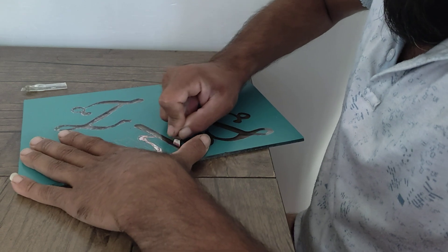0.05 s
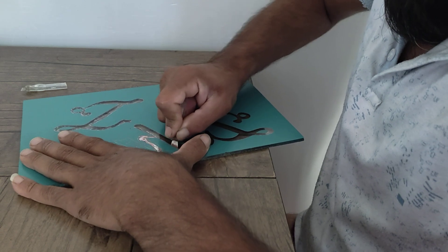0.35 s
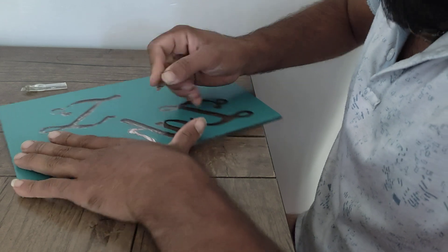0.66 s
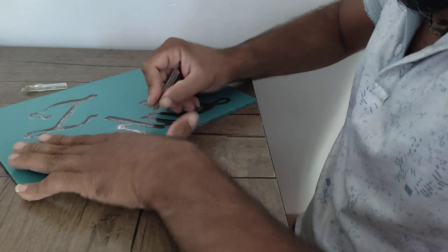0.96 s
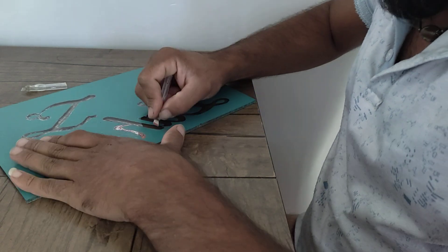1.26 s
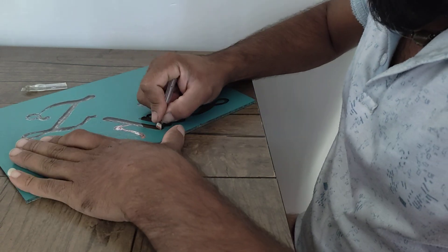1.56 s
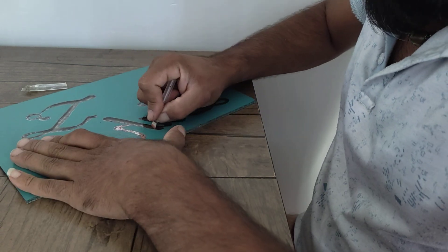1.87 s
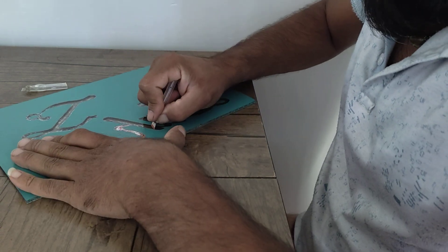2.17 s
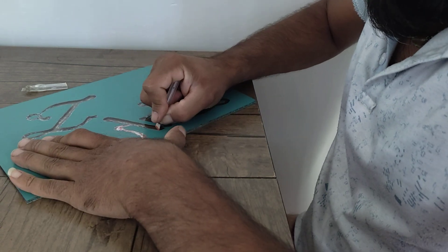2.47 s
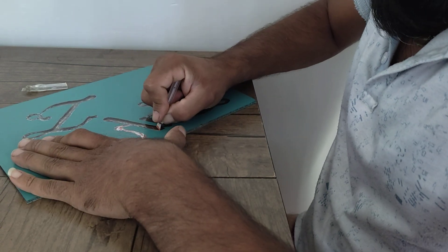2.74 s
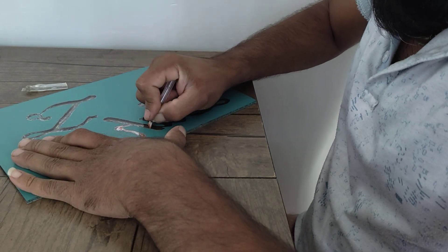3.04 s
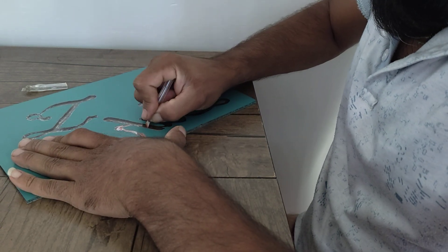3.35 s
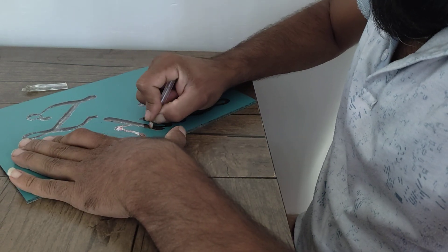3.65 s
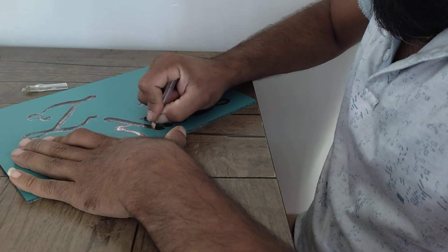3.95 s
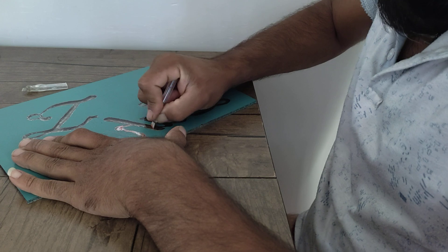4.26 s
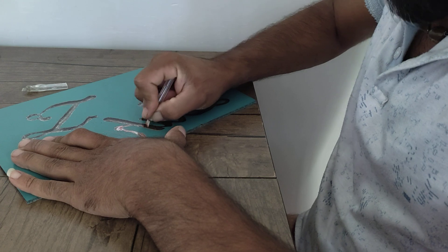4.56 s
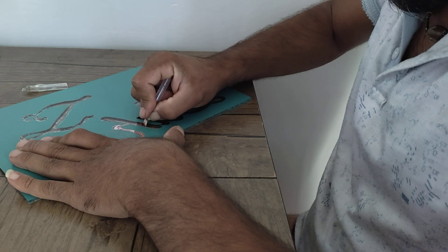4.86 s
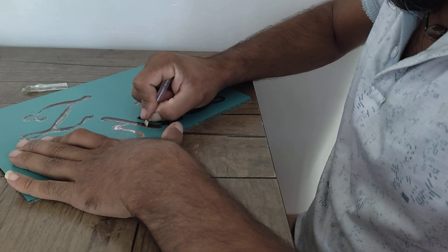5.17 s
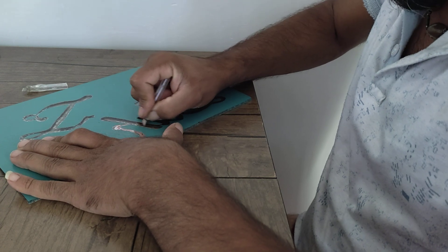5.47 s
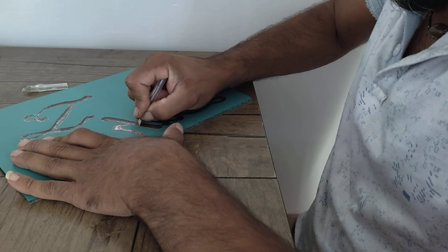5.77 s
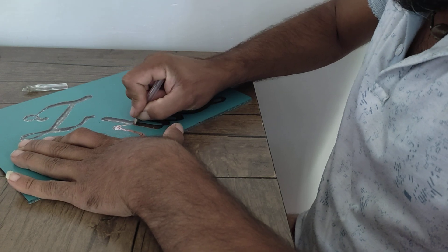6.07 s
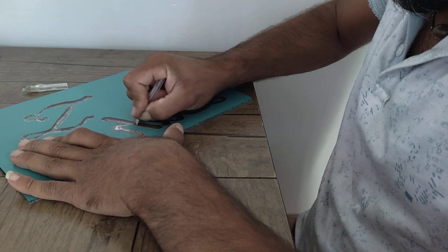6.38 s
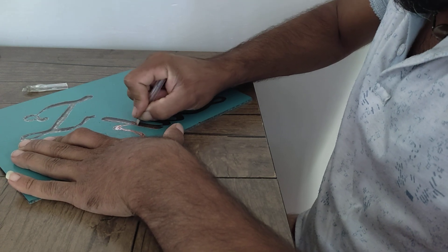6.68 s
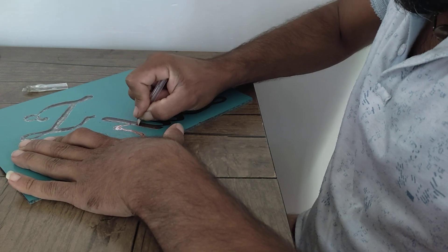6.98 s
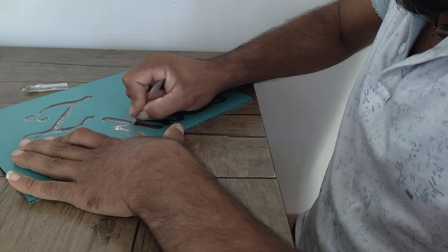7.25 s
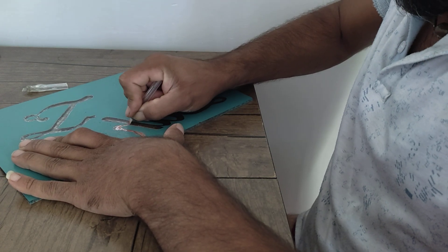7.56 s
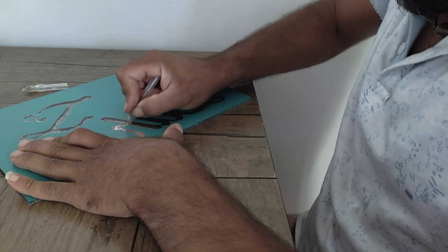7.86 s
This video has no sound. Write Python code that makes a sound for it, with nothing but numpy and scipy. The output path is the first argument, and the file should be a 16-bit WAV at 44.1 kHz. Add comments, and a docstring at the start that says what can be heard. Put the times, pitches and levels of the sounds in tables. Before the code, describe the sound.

Close by in a quiet room, a small pointed tool digs a groove in a thin board. First the board is shifted, rubbing and bumping lightly on the wooden table. Then come gritty scrapes, two or three a second, full of crisp snapping chips and growing stronger in the second half. The board rings briefly and the table resonates low, over a light echo and faint hum.

```python
"""A small pointed tool carves a groove in a thin board on a wooden table in a quiet room.
In the first second the board is shifted: it rubs and judders over the table. From 1.7 s on come short
strokes in which the point digs in, sticks, slips, breaks off chips and eases out; once it squeaks.
Slips and chips make the board ring, and heavy pushes leave the table swinging with a low tone.
All along the room echoes, and soft air noise and mains hum lie underneath."""
import sys
import numpy as np
from scipy import signal
from scipy.io import wavfile

SR = 44100
rng = np.random.default_rng(int(sys.argv[2]) if len(sys.argv) > 2 else 0)


def log_audio(samples):
    """Write samples as a 16-bit WAV file to the path given in sys.argv[1]."""
    # one column per channel
    frames = np.atleast_2d(samples).T
    # limit to full scale, then quantise
    limited = np.clip(frames, -1, 1)
    pcm = np.round(limited * 32767).astype(np.int16)
    wavfile.write(sys.argv[1], SR, pcm)


N = 358091
TIME = np.arange(N) / SR

# strokes and light touches of the tool: start_s, dig_in_s, ease_out_s, scrape_db, small_chip_db,
# depth_db (weight of the lower tones), push_db
STROKES = [ (1.729, 0.052, 0.068, -47, -34, 0.5, -37), (2.215, 0.033, 0.07, -31.5, -24.5, -2.5, -42.5),
           (2.561, .06, .11, -44, -21, 1, -39), (2.933, 0.012, 0.018, -32, -47, 0, -49),
           (3.034, 0.013, 0.06, -39.5, -39, 1.5, -41.5), (3.336, 0.077, 0.057, -32, -21.5, -3.5, -44.5),
           (3.694, 0.096, 0.051, -26.5, -22.5, -6, -39.5), (4.042, 0.043, 0.09, -20, -10.5, -6.5, -36),
           (4.385, 0.11, 0.1, -31.5, -21, -5, -40.5), (5.25, 0.0053, 0.0081, -57, -52, 9, -60),
           (5.331, 0.13, 0.03, -24.5, -10, -5, -35.5), (5.665, 0.031, 0.025, -43, -52, 0, -58),
           (5.703, 0.047, .137, -22, -14, -7, -39), (6.066, 0.092, 0.064, -24.5, -16, -1, -33.5),
           (6.407, .13, .093, -29, -15.5, -2.5, -37), (6.762, 0.099, 0.067, -21, -9, -1.5, -34),
           (7.151, 0.048, 0.023, -27, -18, -4.5, -40.5), (7.221, 0.031, 0.028, -21.5, -11, -7, -49),
           (7.445, 0.014, 0.032, -46, -36, 5, -46), (7.492, 0.038, 0.1, -21, -11, -1, -34.5),
           (7.799, 0.017, 0.068, -22, -14, -0.5, -34.5)]
# big chips that snap out above the rasp: start_s, level_db, length_ms
BIG_CHIPS = [(1.711, -34.5, 4.6), (1.7312, -29, 2.3), (1.761, -17, 4), (1.7856, -16.5, 1),
             (1.8152, -13, 2.1), (1.8313, -16.5, 4.4), (2.2227, -17, 1.8), (2.2524, -16, 5.4),
             (2.5616, -13, 2.1), (2.5823, -9, 3.4), (2.5968, -9, 2.1), (2.6037, -10, 3.2),
             (2.6182, -10, 9.7), (2.6354, -16.5, 8.6), (2.6802, -17.5, 1.6), (2.707, -17.5, 4.3),
             (2.9352, -18.5, 3.6), (2.9481, -18.5, 2.7), (3.0426, -24, 6.6), (3.0529, -26, 1.5),
             (3.0815, -25.5, 2.6), (3.378, -20.5, 4.8), (3.3959, -16.5, 11), (3.4071, -16, 5.6),
             (3.694, -21, 2.5), (3.758, -34, 3.2), (3.7719, -19, 8.3), (4.0518, -14, 1.1),
             (4.0604, -18, 1.9), (4.0803, -9, 2), (4.0888, -8, 2.7), (4.0974, -8.5, 3.1),
             (4.4534, -18, 2.5), (4.467, -13, 13), (4.4857, -9.5, 3.6), (4.509, -29, 2), (4.539, -8.5, 1.6),
             (4.5479, -10, 8.3), (4.571, -15.5, 1.9), (5.3605, -20, 3.9), (5.4145, -5.5, 1.1),
             (5.4232, -7.5, 2.9), (5.4453, -7.5, 3.2), (5.4763, -9.5, 2.4), (5.7125, -16, 1.4),
             (5.749, -15, 7.4), (5.7968, -5.5, 2.6), (5.816, -7.5, 3.6), (5.86, -6, 4.5),
             (5.8743, -3.5, 2.2), (5.8803, -7.5, 3.1), (6.0687, -23, 3.3), (6.0968, -14.5, 1.6),
             (6.1113, -9, 1.9), (6.117, -7, 3.5), (6.128, -6.5, 1.4), (6.1339, -5, 2.5),
             (6.1581, -8.5, 7.4), (6.2094, -21, 2.1), (6.4097, -25, 5.1), (6.4875, -12.5, 7.6),
             (6.524, -9, 1.2), (6.5398, -11.5, 8.6), (6.5676, -10.5, 4.9), (6.6177, -12.5, 5),
             (6.7765, -34, 2.3), (6.876, -10.5, 6.9), (7.1737, -11.5, 19), (7.2427, -10.5, 2.1),
             (7.4996, -13, 2.1), (7.507, -6, 0.97), (7.5171, -8.5, 2.9), (7.5382, -5.5, 4),
             (7.58, -7.5, 5.8), (7.5981, -6, 2.2), (7.6055, -7, 8.2), (7.626, -8.5, 6.6), (7.805, -15, 2.1),
             (7.818, -10.5, 2.7), (7.8306, -11, 4.2), (7.869, -10, 6.1), (7.892, -12, 3.5)]
# how long the board's dense vibration takes to fade by 60 dB: pitch_hz, ring_s
BOARD_RING = [(200,0.041),(2000,0.039),(5000,0.0021),(13000,0.023)]
# how alike left and right are, for close sound and for room sound: pitch_hz, likeness (-1 to 1)
CLOSE_LIKENESS = [(100,0.89),(400,1),(1200,-0.09),(2400,-0.034),(5000,-0.32),(9000,0.017),(14000,-0.97)]
ROOM_LIKENESS = [(40,0),(200,0.69),(400,0.57),(800,0.05),(1500,0.0067),(14000,0)]


def carving():
    """Slips and chips make the board ring; the push of the point shakes board and table together."""
    # tones of board and table moving together: pitch_hz, width_hz, level_db, left_over_right_db
    table_tones = [(81,6.8,0,4.5),(104.5,3.2,8,-2.5),(166.8,12.5,8,1),(230,25,3,0.5),(307.8,34.7,5.5,0),(425,24,-9.5,16.5)]
    contact, travel, scrape_db, depth_db, push_db = strokes()
    rasp = contact * from_db(-1) * rasping(scrape_db)
    crumbs = from_db(-8) * small_chips()
    force = (rasp + crumbs) * stuck_point() + from_db(-8) * big_chips()
    # a deeper bite gives more weight to the lower part of the sound
    lower, upper = split(force, split_hz=2850)
    force = upper + lower * from_db(1.5 + 0.81 * depth_db)
    tremor = stick_slip(per_s=100, uneven=0.6, spread=0.35, slip_s=0.0016, rub=0.4)
    shove = contact * from_db(13 + push_db) * tremor
    body = resonate(shove + from_db(-4) * force, table_tones)
    return ringing_board(force, travel) + body + from_db(-2) * room(body, delay_s=0.00656)


def strokes(deepen_db=0.5, light_push_db=-17, build_share=0.38):
    """The hand guides the point: contact and travel (0 to 1), then scrape, depth and push (dB)."""
    contact, travel, scrape, depth, push = np.zeros((5, N))
    for start_s, dig_in_s, ease_out_s, scrape_db, _, depth_db, push_db in STROKES:
        at = round(start_s * SR)
        age = TIME[:N - at]
        done = np.minimum(age / (dig_in_s + ease_out_s), 1)
        contact[at:] = touching(age, dig_in_s + ease_out_s, edge_s=0.00068)
        travel[at:] = done
        scrape[at:] = scrape_db + arch(age, dig_in_s, ease_out_s, first_db=-11.5, last_db=-11)
        depth[at:] = depth_db + deepen_db * (done - 0.5)
        # the push starts light and is full after build_share of the stroke
        push[at:] = push_db + light_push_db * np.maximum(1 - done / build_share, 0)
    return contact, travel, scrape, depth, push


def rasping(scrape_db):
    """A light touch only rubs dully; a harder one tears the surface and gains treble."""
    slips = stick_slip(per_s=220, uneven=0.5, spread=0.3, slip_s=0.0008, rub=0.5)
    rub, tear = split(slips, split_hz=4600)
    treble_db = np.minimum(2 + 0.25 * scrape_db, 0)
    return from_db(scrape_db) * (rub + tear * from_db(treble_db))


def stick_slip(per_s, uneven, spread, slip_s, rub):
    """Two surfaces catch and let go at uneven times; each slip is a short burst over steady rubbing."""
    draws = rng.uniform(-1, 1, (6000, 2))
    gaps_s = np.exp(uneven * draws[1:, 0]) / per_s
    starts = np.append(0, np.cumsum(gaps_s))
    latest = np.searchsorted(starts, TIME, "right") - 1
    bursts = np.exp(spread * draws[latest, 1] - (TIME - starts[latest]) / slip_s)
    return rms_one((rms_one(bursts) + rub) * rng.standard_normal(N))


def stuck_point(stick_s=0.0097, hush_db=-6.5):
    """Before a big chip gives way the point is stuck; this gain makes the rasp dip there."""
    gain = np.ones(N)
    time_left = TIME[SR // 25:0:-1]
    for start_s, _, _ in BIG_CHIPS:
        at = round(start_s * SR)
        gain[at - len(time_left):at] *= from_db(hush_db * np.exp(-(time_left / stick_s) ** 2))
    return gain


def big_chips(treble_hz=5360, treble_db=3, treble_length_share=0.71):
    """Big chips snap out; their treble is spent sooner than the rest of their sound."""
    dull, _ = split(breaking(BIG_CHIPS, crack=4.3, scatter=0.49), treble_hz)
    shorter = [(start_s, db + treble_db, ms * treble_length_share) for start_s, db, ms in BIG_CHIPS]
    _, sharp = split(breaking(shorter, crack=4.3, scatter=0.46), treble_hz)
    return dull + sharp


def small_chips(per_s=96, length_ms=2.3, uneven=0.3, spread_db=1):
    """All through a stroke the point breaks off small chips, the largest where it bites deepest."""
    chips = []
    for start_s, dig_in_s, ease_out_s, _, chip_db, _, _ in STROKES:
        gap_draws, level_draws = rng.uniform(-1, 1, (2, 40))
        ages = np.cumsum(np.exp(uneven * gap_draws) / per_s)
        bite_db = arch(ages, dig_in_s, ease_out_s, first_db=-14.5, last_db=-11.5)
        levels_db = chip_db + bite_db + spread_db * level_draws
        chips += [(start_s + age, db, length_ms)
                  for age, db in zip(ages, levels_db) if age < dig_in_s + ease_out_s]
    return breaking(chips, crack=2.2, scatter=0.89)


def breaking(chips, crack, scatter):
    """Each chip starts with a sharp crack and tears free over a few milliseconds."""
    force, size = np.zeros(N), SR // 50
    noise, strength = rng.standard_normal((2, N))
    tear = noise * np.exp(scatter * np.clip(strength, -2, 2))   # a few fibres snap harder than the rest
    for start_s, level_db, length_ms in chips:
        at = round(start_s * SR)
        fade = np.exp(-(TIME[:size] * 1000 / length_ms) ** 1.5)
        burst = rms_one(tear[at:at + size] * fade) * np.sqrt(np.mean(fade ** 2))
        burst[0] = crack
        force[at:at + size] += from_db(level_db) * burst
    return force


def ringing_board(force, travel, spots=7, detune=0.03):
    """As the point moves, each spot of the groove shakes the board and the room in its own way."""
    # tones of the bending board: pitch_hz, width_hz, level_db, left_over_right_db
    board_tones = [(655,28,-9.5,6),(1249,23.5,-7.5,3),(1802,48,-4,-17),(2860,78,4,9.5),(3196,350,4,-1.5),(3820,146,8.5,2),(4636,440,1.5,-4),(5660,91,-2,10.5),(6540,153,-2.5,-15.5),(9830,157,-14.5,23),(11870,480,-2.5,9)]
    # its dense, quickly dying vibration: pitch_hz, level_db
    board_colour = [(100,-29),(300,-5),(520,-18.5),(680,-8),(1000,-4.5),(1600,-4.5),(2400,2),(3500,4),(4800,4),(6300,2),(7800,-14.5),(10000,-11.5),(12500,7),(14500,-4.5)]
    # the side that vibration leans to: pitch_hz, left_over_right_db
    board_sides = [(300,-7.5),(1200,0),(4000,-6.5),(7000,7.5),(9000,-24),(11000,9.5),(14000,9)]
    # a tone that speaks more as the groove lengthens: pitch_hz, width_hz, level_db, left_over_right_db
    groove_tone = [(2170,160,7,2.5)]
    # the strength of that tone: time_s, level_db
    groove_strength = [(1.7,-6.5),(3.4,-1),(5.4,-3),(6.1,-0.5),(7.8,0.5)]
    groove_db = np.interp(TIME, *np.transpose(groove_strength))
    groove = resonate(force * from_db(groove_db), groove_tone)
    out, size = np.zeros((2, N)), SR // 8
    for spot in range(spots):
        share = np.sqrt(np.maximum(1 - np.abs(travel * (spots - 1) - spot), 0))
        tones = [(hz * (1 + detune * rng.uniform(-1, 1)), *rest) for hz, *rest in board_tones]
        dense = shaped_noise(size, board_colour, CLOSE_LIKENESS, BOARD_RING, board_sides)
        ring = from_db(1.5) * resonate(signal.unit_impulse(size), tones)
        board = through(force * share, dense + ring) + groove * share
        out += board + room(board, delay_s=0.007)
    return out


def table_swing(rise_s=0.054):
    """A low tone of the table top swells and rings on after each heavy push."""
    # swings under the leaning hand: start_s, level_db, pitch_hz, ring_s (time to fade by 60 dB)
    swings = [(.002,-23,83,0.15),(0.189,-37.5,100,0.7),(1.773,-35,170,0.71),(2.581,-22,168.4,0.19),(3.381,-25,169.6,0.3),(4.521,-40,101.8,0.68),(5.43,-31,102,0.84),(6.18,-46,103.8,0.95),(6.562,-37,103.3,1),(6.872,-38,103.3,0.97),(7.548,-30.5,101.3,0.75),(7.84,-38.5,102.8,0.97)]
    out = np.zeros(N)
    for start_s, level_db, pitch_hz, ring_s in swings:
        at = round(start_s * SR)
        age = TIME[:N - at]
        swell = 1 - np.exp(-age / rise_s)
        out[at:] += from_db(level_db - 60 * age / ring_s) * swell * np.sin(2 * np.pi * pitch_hz * age)
    return out


def sliding_board(gain_db=5.5):
    """The board rubs over the table under the hand, loudest where it moves fastest."""
    # the slides: start_s, speed_up_s, slow_down_s, level_db
    slides = [(0, 0.0017, 0.038, -44), (.113, 0.0074, 0.033, -51), (0.18, 0.034, 0.016, -45),
              (0.374, 0.0057, 0.0245, -45), (0.589, 0.038, 0.08, -54), (.72, 0.13, .25, -63)]
    # tone colour of the rubbing: pitch_hz, level_db
    rub_colour = [(60,-13),(150,9.5),(300,0.5),(450,-5),(700,-4.5),(1150,-9),(2100,-3.5),(4000,-10),(6000,-15),(8000,-23),(14000,-22)]
    grain = stick_slip(per_s=140, uneven=0.65, spread=0.83, slip_s=0.0025, rub=0.88)
    rub = rms_one(through(grain, shaped_noise(SR // 8, rub_colour, CLOSE_LIKENESS, BOARD_RING)))
    loudness = np.zeros(N)
    for start_s, speed_up_s, slow_down_s, level_db in slides:
        age = TIME - start_s
        contact = touching(age, speed_up_s + slow_down_s, edge_s=0.001)
        speed_db = arch(age, speed_up_s, slow_down_s, first_db=-8.5, last_db=-8.5)
        loudness += contact * from_db(gain_db + level_db + speed_db)
    return rub * loudness


def juddering_board(gain_db=36.5):
    """As the board is turned it jumps on in small dull knocks."""
    # the jumps: start_s, level_db
    jumps = [(0.379, -39.5), (0.76, -39.5), (0.803, -49), (0.822, -41.5), (0.865, -40.5), (0.896, -43),
             (0.934, -41.5), (0.956, -44), (0.968, -48)]
    # tone colour of a knock: pitch_hz, level_db
    knock_colour = [(100,-21),(250,-7),(450,4.5),(650,-17),(950,-4),(1400,-16),(3000,-14),(8000,-38)]
    # how long a knock takes to fade by 60 dB: pitch_hz, ring_s
    knock_ring = [(200,0.036),(600,0.0085),(3000,0.014)]
    knocks = np.zeros(N)
    for start_s, level_db in jumps:
        knocks[round(start_s * SR)] = from_db(level_db + gain_db)
    return through(knocks, shaped_noise(SR // 8, knock_colour, CLOSE_LIKENESS, knock_ring))


def squeak():
    """The slips of the point lock to one pitch for a few milliseconds."""
    # the point squeaks as it catches: start_s, level_db, pitch_hz, rise_s
    squeaks = [(3.689,-25,4920,0.0011)]
    out, age = np.zeros(N), TIME[:SR // 20]
    for start_s, level_db, pitch_hz, rise_s in squeaks:
        at = round(start_s * SR)
        swell = age / rise_s * np.exp(1 - age / rise_s)
        out[at:at + len(age)] += from_db(level_db) * swell * np.sin(2 * np.pi * pitch_hz * age)
    return out


def room(sound, delay_s):
    """The walls answer a little later, the bass lasting longest."""
    # tone colour of the echo: pitch_hz, level_db
    echo_colour = [(100,-3),(400,-0.5),(1500,-5.5),(2600,-2),(4500,-7.5),(7000,-7.5),(13000,-11.5)]
    # how long the echo takes to fade by 60 dB: pitch_hz, ring_s
    echo_ring = [(100,0.8),(260,0.45),(700,0.57),(1840,0.46),(4850,0.33),(12800,0.27)]
    tail = shaped_noise(SR * 3 // 4, echo_colour, ROOM_LIKENESS, echo_ring)
    return through(sound, np.pad(tail, ((0, 0), (round(delay_s * SR), 0))))


def background(air_db=-53.5):
    """Still room air with a steady mains hum."""
    # tone colour of the air: pitch_hz, level_db
    air_colour = [(25,-29),(60,-13),(100,-1),(140,-5),(205,-1),(260,-6),(350,-8),(520,-14.5),(900,-15),(1250,-19),(4700,-24.5),(6200,-27.5),(7500,-36.5),(14000,-31)]
    # hum and faint electrical whine: pitch_hz, level_db
    hum_tones = [(100,-75),(199.5,-63),(297,-65.5),(2498,-80.5),(4996,-79),(7547,-101),(9997,-90.5)]
    hum = sum(np.sqrt(2) * from_db(db) * np.sin(2 * np.pi * (hz * TIME + rng.random()))
              for hz, db in hum_tones)
    return from_db(air_db) * rms_one(shaped_noise(N, air_colour, ROOM_LIKENESS)) + hum


def arch(age, rise_s, fall_s, first_db, last_db):
    """Level in dB of a push of the hand: it rounds up to 0 dB and sinks again."""
    rising = np.clip(1 - age / rise_s, 0, 1)
    falling = np.clip((age - rise_s) / fall_s, 0, 1)
    return first_db * rising ** 2 + last_db * falling ** 2


def touching(age, length_s, edge_s):
    """Contact (0 to 1) that begins at age 0 and lasts for length_s."""
    return np.clip(np.minimum(age, length_s - age) / edge_s, 0, 1)


def resonate(force, tones):
    """A force sets tones ringing, every second one upside down, each leaning to its own side."""
    out = np.zeros((2, len(force)))
    for k, (pitch_hz, width_hz, level_db, lean_db) in enumerate(tones):
        decay = np.exp(-np.pi * width_hz / SR)
        feedback = [1, -2 * decay * np.cos(2 * np.pi * pitch_hz / SR), decay ** 2]
        ring = (1 - decay ** 2) / 2 * signal.lfilter([1, 0, -1], feedback, force + 1e-18)
        out += (-1) ** k * ring * from_db([[level_db + lean_db / 2], [level_db - lean_db / 2]])
    return out


def shaped_noise(size, colour, likeness, ring=None, sides=None):
    """Stereo noise built in third-octave bands; it dies away if ring times are given."""
    edges_hz = np.geomspace(22, 16000, 29)
    out, white = np.zeros((2, size)), rng.standard_normal((2, 2, size))
    for k, (low, high) in enumerate(zip(edges_hz, edges_hz[1:])):
        hz = np.sqrt(low * high)
        fade = from_db(-60 * TIME[:size] / at_hz(ring, hz)) if ring else 1
        band = signal.butter(2, [low, high], "band", fs=SR, output="sos")
        mid, side = map(rms_one, signal.sosfilt(band, white[k % 2] * fade))
        alike = np.clip(at_hz(likeness, hz), -1, 1)
        mid, side = np.sqrt(1 + alike) * mid, np.sqrt(1 - alike) * side
        pair = np.array([rms_one(mid + side), rms_one(mid - side)])
        lean_db = at_hz(sides, hz) if sides else 0
        gain = from_db(at_hz(colour, hz) + lean_db * np.array([[0.5], [-0.5]]))
        out += pair * gain * np.sqrt(2 * (high - low) / SR / size)
    return out


def through(sound, response):
    """Pass a sound through a stereo response: what a single click would set ringing."""
    return signal.oaconvolve(np.atleast_2d(sound), response, axes=1)[:, :N]


def split(sound, split_hz):
    """The part of a sound below a pitch, and the part above it."""
    lower = signal.sosfiltfilt(signal.butter(2, split_hz, fs=SR, output="sos"), sound + 1e-18)
    return lower, sound - lower


def at_hz(table, hz):
    """Read between the rows of a table, with every octave equally wide."""
    pitches, values = np.transpose(table)
    return np.interp(np.log(hz), np.log(pitches), values)


def from_db(db):
    """Decibels to gain."""
    return 10 ** (np.asarray(db) / 20)


def rms_one(sound):
    """Scale a sound to an average strength (rms) of 1."""
    return sound / np.sqrt(np.mean(sound ** 2) + 1e-20)


def scene():
    """Work on the board, its room and the background."""
    cuts = carving()
    small_sounds = sliding_board() + juddering_board() + squeak()
    echo = from_db(-3) * room(small_sounds, delay_s=0.0064)
    return cuts + small_sounds + echo + table_swing() + background()


def record(dry):
    """The highest treble is cut off steeply."""
    cutoff_hz = 14400
    return signal.sosfilt(signal.ellip(10, 0.3, 80, cutoff_hz, fs=SR, output="sos"), dry)


dry = scene()
out = record(dry)
log_audio(out)
```